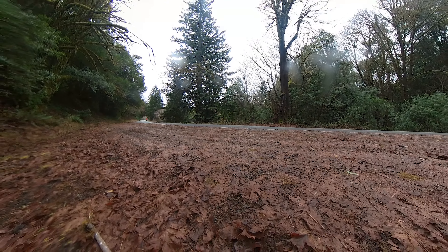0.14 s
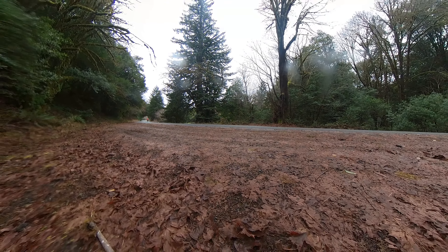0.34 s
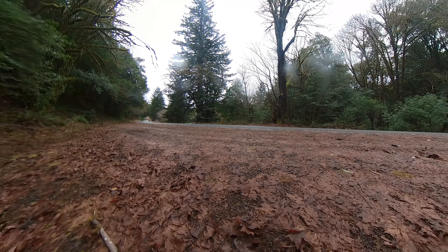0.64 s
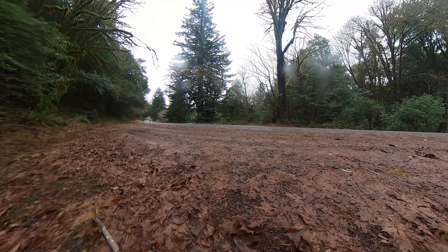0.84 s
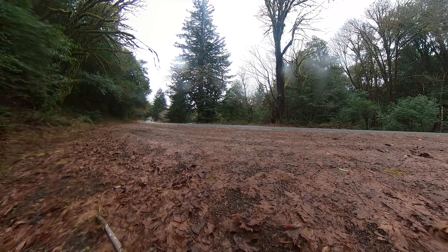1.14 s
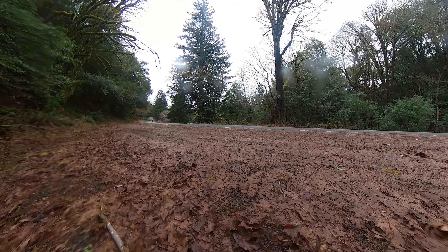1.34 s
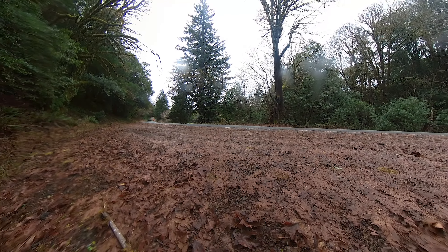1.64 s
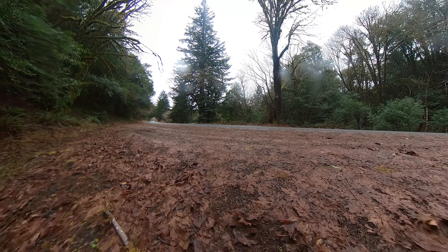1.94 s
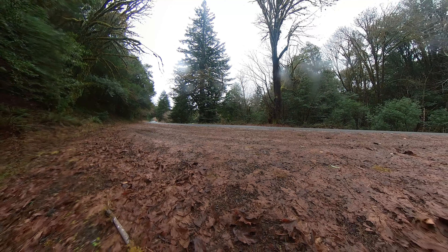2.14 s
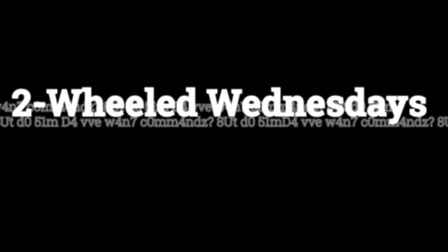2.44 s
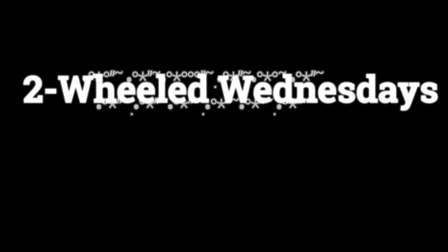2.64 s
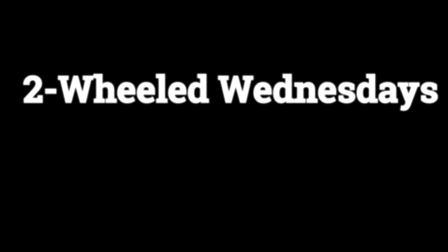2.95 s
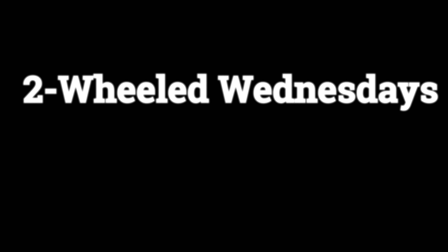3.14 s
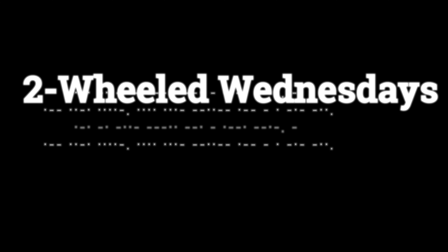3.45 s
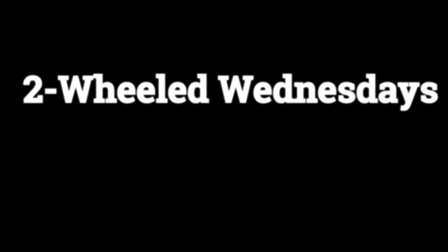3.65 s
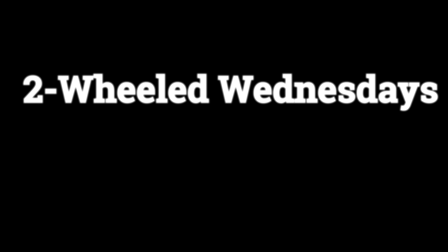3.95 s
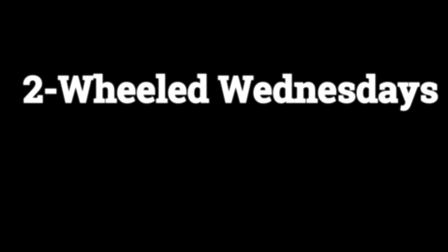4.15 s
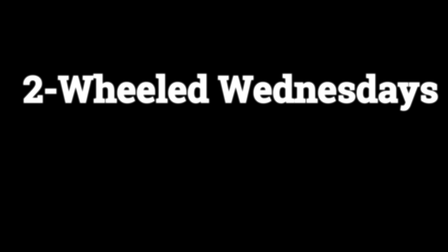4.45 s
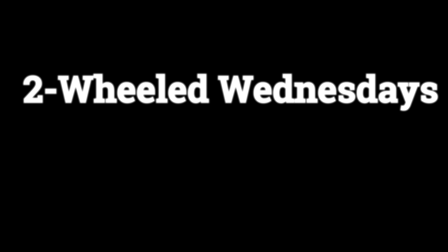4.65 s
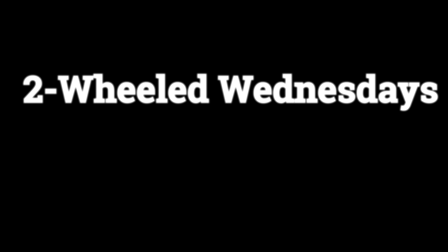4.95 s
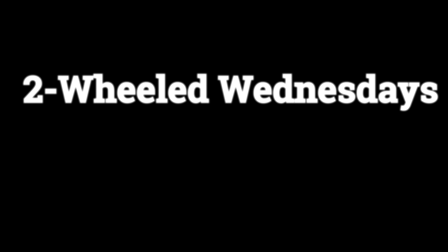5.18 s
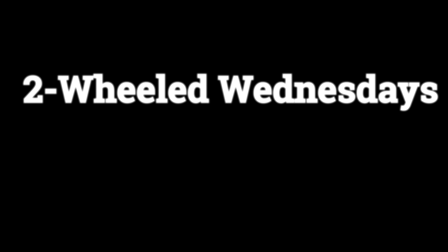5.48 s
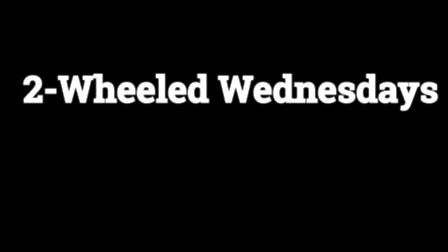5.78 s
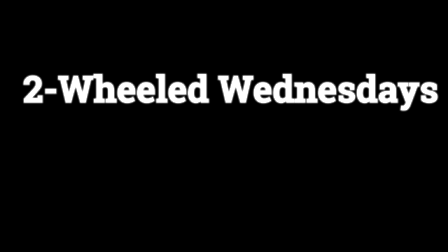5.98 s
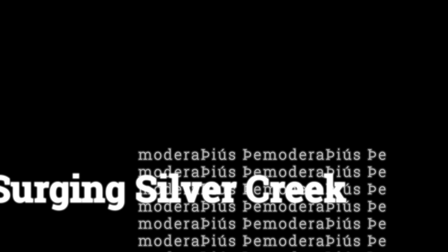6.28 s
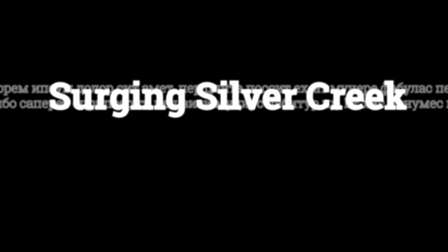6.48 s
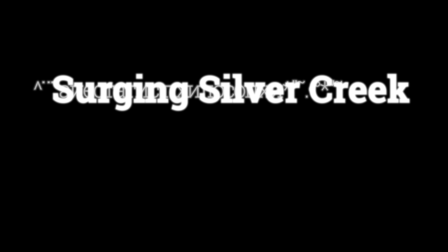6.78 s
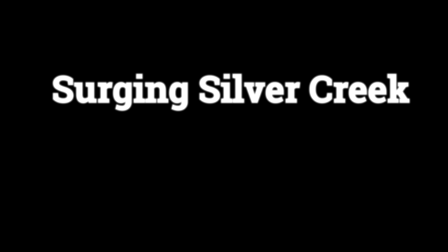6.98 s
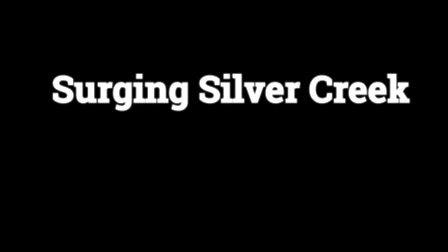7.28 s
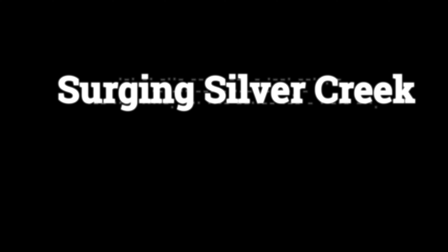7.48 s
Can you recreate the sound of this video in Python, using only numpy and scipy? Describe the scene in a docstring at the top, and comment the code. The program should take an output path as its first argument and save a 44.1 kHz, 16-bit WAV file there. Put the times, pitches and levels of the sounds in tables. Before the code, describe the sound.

A close mono microphone hears a bicycle hub ticking slowly over a faint low murmur. Ticking breaks into scattered slips with a burst of chain squeaks and tyre hum. Under pedalling, hard frame knocks and rattles cluster early, while thin high chirps, roller clicks and gritty sizzle grow denser. The chain then falls quiet and bright ticks run nearly thirty a second, spreading gradually until the cut, with brief dull reflections around them.

```python
"""A bicycle's rear wheel close to a microphone, over a deep murmur, tyre hum, rumble and the hiss of the spokes.
The freewheel first ticks slowly, a spray of impacts ringing the hub at each tooth; single teeth then slip.
The crank drives the chain: rollers click, links squeak and sizzle, knocks shake the frame, a spoke pings.
Teeth slip again as the crank lets go, then the wheel coasts with fast ticks, their gaps slowly growing.
A small hard space echoes freewheel, chain and frame throughout."""
import sys
import numpy as np
from scipy import signal
from scipy.fft import rfft, irfft, next_fast_len
from scipy.io import wavfile
from scipy.ndimage import uniform_filter1d

SR = 44100
rng = np.random.default_rng(int(sys.argv[2]) if len(sys.argv) > 2 else 0)


def master(y):
    """Save y as 16-bit WAV."""
    cut = np.clip(np.atleast_2d(y).T, -1, 1)
    pcm = np.round(cut * 32767)  # scale
    wavfile.write(sys.argv[1], SR, pcm.astype(np.int16))


N = 336042
BAND_TOP_HZ = .49 * SR  # just below Nyquist


def undb(db):
    """dB to gain."""
    return 10 ** (np.asarray(db) / 20)


def unit(x):
    """Scale to rms 1."""
    return x / np.sqrt(np.mean(x ** 2))


def peak_one(x):
    """Scale to peak 1."""
    return x / np.abs(x).max()


def band(x, lo_hz, hi_hz, order=2):
    """Butterworth band-pass."""
    return signal.sosfilt(signal.butter(order, [lo_hz, hi_hz], "band", fs=SR, output="sos"), x)


def noise_band(lo_hz, hi_hz):
    """Band-passed white noise."""
    return band(rng.standard_normal(N), lo_hz, hi_hz)


def coloured(spectrum):
    """Noise of rms 1, its spectrum drawn through (frequency [Hz], density [dB]) points."""
    hz, db = np.transpose(spectrum)
    size = next_fast_len(N)
    bins_hz = np.arange(1, size // 2 + 2) * SR / size
    gain = undb(np.interp(np.log(bins_hz), np.log(hz), db, left=-90, right=-90))
    return unit(irfft(rfft(rng.standard_normal(size)) * gain, size)[:N])


def envelope(points):
    """Levels in dB at every sample, straight lines between (time [s], level [dB]) points."""
    return np.interp(np.arange(N) / SR, *np.transpose(points))


def smooth_twice(x, size):
    """Two running means."""
    return uniform_filter1d(uniform_filter1d(x, size), size)


def walk(rate_hz):
    """Random levels held 1 / rate_hz seconds and slewed twice; spread near 1."""
    hold = int(SR / rate_hz)
    steps = np.repeat(rng.standard_normal(N // hold + 1), hold)
    return 1.9 * smooth_twice(steps, hold)[:N]


def add(track, s, sound, peak_db):
    """Lay a sound with the given peak into the track."""
    i = int(s * SR)
    track[i:i + len(sound)] += (undb(peak_db) * peak_one(sound))[:N - i]


def ring(modes, length_s, scatter_db, detune):
    """One blow on an object: each mode is four close decaying sines, mixed anew by every blow."""
    t = np.arange(int(length_s * SR))[:, None] / SR
    hz, db, t60_s = np.repeat(np.transpose(modes), 4, axis=1)
    level_chance, pitch_chance = rng.standard_normal((len(hz), 2)).T
    decay = np.exp(-np.log(1000) * t / t60_s)
    tones = np.sin(2 * np.pi * hz * (1 + detune * pitch_chance) * t)
    return (undb(db + scatter_db * level_chance) * decay * tones).sum(1)


def chatter(length_s, density, rise_s):
    """A spray of small impacts over a weaker scrape: swells in rise_s, decays by e each length_s."""
    t = np.arange(int(5 * length_s * SR) + 8) / SR
    hit_chance, height = rng.random((len(t), 2)).T
    hits = np.where(hit_chance < density, 1, .15) * (2 * height - 1)
    return hits * (1 - np.exp(-t / rise_s)) * np.exp(-t / length_s)


def squeak(hz, length_s, glide):
    """Stick-slip whistle of metal on metal: a short gliding tone, its level torn by the slipping."""
    t = np.linspace(0, 1, int(length_s * SR) + 12)  # fraction of the length
    pitch_hz = hz * (1 + glide * (t - .5))
    slips = unit(smooth_twice(rng.standard_normal(len(t)), 12))
    level = np.sin(np.pi * t ** .72) ** 2 * (1 + .8 * slips)
    return level * np.sin(2 * np.pi * np.cumsum(pitch_hz) / SR)


def murmur():
    """Deep murmur of the place: low noise swelling slowly from first to last."""
    return undb(np.linspace(-86.5, -76.5, N)) * unit(noise_band(35, 88))


def room(x):
    """Dense, slightly dull echoes of nearby hard surfaces: a decaying noise tail."""
    t60_s, wet_db, gap_s, damp_hz = .46, -12, .0011, 9000
    t = np.arange(int(.4 * SR)) / SR
    tail = rng.standard_normal(len(t)) * np.exp(-np.log(1000) * t / t60_s) * (t > gap_s)
    tail = band(tail, 74, damp_hz, order=1)
    return x + undb(wet_db) * signal.fftconvolve(x, tail / np.linalg.norm(tail))[:N]


# turning wheel, spectrum of the rumble: (frequency [Hz], density [dB])
RUMBLE_SPECTRUM = [(60, -40), (85, -37), (113, -0.5), (171, -5.5), (229, -3.5), (285, 0.5), (400, -0.5),
                   (520, -67)]
# rumble: (time [s], level [dB])
RUMBLE_LEVEL = [(0, -72), (2.0, -68), (2.78, -60), (2.9, -50.5), (3.6, -61.5), (5.0, -60.5), (5.3, -66),
                (7.62, -66)]


def wheel_rumble():
    """Low noise of the turning wheel, wavering slightly."""
    return undb(envelope(RUMBLE_LEVEL) + .7 * walk(11)) * coloured(RUMBLE_SPECTRUM)


# spokes in air, spectrum of the hiss: (frequency [Hz], density [dB])
HISS_SPECTRUM = [(350, -23), (620, -2), (800, -2), (1090, -2.5), (2700, -1.5), (3950, -10.5), (5210, -10.5),
                 (6490, -14.5), (9500, 0.5), (12400, -72)]
# hiss: (time [s], level [dB])
HISS_LEVEL = [(0, -60.5), (1.56, -65.5), (1.6, -55.5), (1.8, -60), (2.5, -52.5), (5.0, -50), (5.15, -58.5),
              (5.3, -54), (7.62, -56)]


def spoke_hiss():
    """Spokes hiss through the air: wavering coloured noise."""
    return undb(envelope(HISS_LEVEL) + 1.5 * walk(40)) * coloured(HISS_SPECTRUM)


# air ring in the tyre, then the broad roar above it: (centre [Hz], width [Hz])
TYRE_BANDS = [(474, 40), (530, 110)]
# tyre hum: (time [s], level [dB])
HUM_LEVEL = [(0, -71.5), (1.55, -80), (1.6, -51), (1.78, -55), (1.95, -58.5), (2.2, -51.5), (3.4, -53.5),
             (4.8, -56.5), (5.03, -56.5), (5.11, -77), (5.22, -52), (6.0, -53.5), (6.4, -57.5),
             (7.62, -55.5)]
# roar above the hum: (time [s], level [dB])
ROAR_LEVEL = [(0, -72), (1.55, -72.5), (2.3, -57.5), (5.0, -58.5), (5.12, -63), (5.35, -50), (6.4, -55),
              (7.62, -59)]


def tyre():
    """The tyre's air ring hums and roars: two noise bands, each wavering on its own."""
    out = np.zeros(N)
    for (hz, width_hz), level in zip(TYRE_BANDS, (HUM_LEVEL, ROAR_LEVEL)):
        noise = unit(noise_band(hz - width_hz / 2, hz + width_hz / 2))
        out += undb(envelope(level) + 2.76 * walk(14)) * noise
    return out


# blows on the frame: (time [s], thud peak [dB], rattle peak [dB], contact [ms],
# rattle decay time [s], rattle centre [Hz])
FRAME_KNOCKS = [(1.041, -50, -44, 0.9, 0.016, 1000), (2.246, -29.5, -28, 0.25, 0.027, 1240),
                (2.531, -20, -19, 0.17, 0.0094, 1520), (2.576, -32, -33, 0.23, 0.0089, 1570),
                (2.814, -17, -28, 0.65, 0.046, 1270), (2.849, -24.5, -30, 2.1, 0.019, 2300),
                (2.946, -32.5, -39.5, 2.56, 0.043, 1460), (3.156, -32, -42, 2.8, 0.015, 1520),
                (4.138, -29, -25, 0.32, 0.029, 1220)]
# frame modes: (frequency [Hz], level [dB], t60 [s])
FRAME_MODES = [(166.3, -7, 0.42), (240, -11.5, 0.21), (358, 11, 0.048), (427, 6.5, 0.081),
               (481, 6.5, 0.065), (538, 5.5, 0.059), (750, -1, 0.091), (1037, -3, 0.18), (1410, 0.5, 0.05),
               (1800, 6, 0.051)]


def frame_knocks():
    """Knocks shake the frame, longer contact giving a duller thud, with loose parts rattling."""
    out = np.zeros(N)
    for s, thud_db, rattle_db, contact_ms, rattle_s, rattle_hz in FRAME_KNOCKS:
        blows = chatter(rattle_s, density=.025, rise_s=.0029)
        push = np.hanning(int(contact_ms * SR / 1000) + 3)
        body = ring(FRAME_MODES, .25, scatter_db=2, detune=.03)
        thud = signal.fftconvolve(np.convolve(blows, push), body)
        # a brief tap is too light to move the deep modes
        low_hz = 62 + 70 / (contact_ms + .028)
        add(out, s, band(thud, low_hz, 4200, order=3), thud_db)
        rattle = chatter(rattle_s, density=.05, rise_s=.0011)
        add(out, s, band(rattle, rattle_hz / 1.98, rattle_hz * 1.6), rattle_db)
        bright_rattle = chatter(rattle_s, density=.091, rise_s=.009)
        add(out, s, band(bright_rattle, 1400, 10300), rattle_db - .5)
    return out


# pings of a spoke: (time [s], peak [dB])
SPOKE_PINGS = [(3.347, -28)]
# spoke modes: (frequency [Hz], level [dB], t60 [s])
SPOKE_MODES = [(3060, 0, .12)]


def spoke_pings():
    """A spoke slips over its neighbour with a squeak, then rings."""
    out = np.zeros(N)
    for s, db in SPOKE_PINGS:
        tap = chatter(.0056, density=.12, rise_s=.002)
        spoke = ring(SPOKE_MODES, .2, scatter_db=2, detune=.03)
        add(out, s, signal.fftconvolve(tap, spoke), db)
        add(out, s - .008, squeak(3590, .0153, -.28), db - 3)
    return out


# sprocket modes, for roller clicks and sizzle: (frequency [Hz], level [dB], t60 [s])
SPROCKET_MODES = [(6320, -10.5, 0.02), (6624, -3, 0.019), (7670, -14, 0.012), (12730, -10, 0.006)]
# links grinding, heard through the frame: (frequency [Hz], density [dB])
GRIND_SPECTRUM = [(600, -23), (800, -5.5), (1030, -3.5), (1300, -26), (3400, -2), (4600, -6), (5600, -10)]
# gain on the whole sizzle mix: (time [s], level [dB])
SIZZLE_LEVEL = [(0, -50.5), (1.4, -59.5), (1.58, -41.5), (1.8, -52), (2.8, -46), (3.3, -39), (3.8, -39.5),
                (5.02, -35), (5.15, -54), (5.3, -49.5), (7.62, -48)]


def chain_sizzle():
    """A host of tiny squeaks, scraping, grinding and slack links tapping the sprocket at random."""
    grains = np.zeros(N)
    for when, pitch, size, length, bend in rng.random((1500, 5)):
        tiny = squeak(8500 + 7600 * pitch ** .38, .0019 + .028 * length, .16 * (bend - .5))
        add(grains, when * (N - 9) / SR, tiny, -3.5 * np.log(size + .03))
    scrape = undb(3.7 * walk(60)) * noise_band(4700, BAND_TOP_HZ)
    # strong wavering tears the grind into crackles
    grind = undb(np.minimum(7 * walk(300), 12)) * coloured(GRIND_SPECTRUM)
    slack = np.zeros(N)
    # six spots on the sprocket, each with its own ring; 45 taps a second on average, mostly faint
    for tap_chance, strength in rng.random((6, 2, N)):
        taps = (tap_chance < 45 / SR) * undb(28 * strength)
        blows = chatter(.0034, density=.45, rise_s=.0005)
        spot = np.convolve(blows, ring(SPROCKET_MODES, .024, scatter_db=-9.5, detune=.045))
        slack += signal.fftconvolve(taps, spot)[:N]
    slack = band(slack, 2800, BAND_TOP_HZ)
    mix = .71 * unit(grains) + .13 * unit(scrape) + .15 * unit(grind) + .38 * unit(slack)
    return undb(envelope(SIZZLE_LEVEL)) * mix


# dry links squeaking: (time [s], peak [dB], pitch [Hz])
LINK_SQUEAKS = [(1.603, -21, 9200), (1.63, -29, 9800), (1.653, -25.5, 10500), (1.9, -24.5, 11500),
                (1.997, -37, 4770), (2.189, -21, 14600), (2.314, -25, 12130), (2.518, -18.5, 12340),
                (2.748, -14.5, 13500), (2.865, -15, 15000), (3.0207, -23, 12650), (3.1513, -18.5, 13300),
                (3.175, -20, 13300), (3.661, -16, 15100), (3.691, -11.5, 13200), (4.123, -19, 15200),
                (4.133, -12, 13650), (4.315, -18, 13000), (4.412, -30.5, 3470), (4.4134, -22, 13900),
                (4.517, -34, 2800), (4.7, -25, 9000), (4.526, -17.5, 14700), (4.571, -17, 14600),
                (4.717, -18, 13300), (4.815, -15.5, 14200), (4.8344, -9, 15400), (4.8988, -21, 15200),
                (4.954, -12.5, 15000), (5.013, -16, 14300)]


def link_squeaks():
    """Dry links squeak, each gliding up or down at random."""
    out = np.zeros(N)
    for s, db, hz in LINK_SQUEAKS:
        add(out, s - .002, squeak(hz, .013, .12 * rng.standard_normal()), db)
    return out


# rollers seating on the sprocket: (time [s], peak [dB])
ROLLER_CLICKS = [(2.212, -30), (2.2532, -30), (2.4842, -36), (2.53, -29), (2.77, -27), (2.8823, -28),
                 (2.9302, -27.5), (2.9575, -26), (3.004, -29), (3.0404, -35), (3.057, -22.5), (3.0884, -28),
                 (3.114, -22), (3.133, -22), (3.1717, -24.5), (3.271, -32), (3.3173, -29), (3.3544, -24.5),
                 (3.4667, -31), (3.501, -19.5), (3.5736, -31), (3.6357, -29.5), (3.781, -25), (3.863, -27),
                 (3.899, -30), (3.9953, -29), (4.0821, -27), (4.116, -24), (4.136, -22), (4.1812, -25),
                 (4.2124, -28), (4.2793, -24), (4.314, -28), (4.343, -24), (4.376, -27), (4.4064, -21.5),
                 (4.4387, -25), (4.527, -23.5), (4.555, -37), (4.561, -25), (4.5815, -24), (4.6253, -27),
                 (4.6616, -33), (4.73, -24), (4.825, -29), (4.8837, -25), (4.909, -24), (4.958, -27),
                 (4.9997, -23), (5.0262, -24), (5.0587, -27.5), (5.0932, -29.5)]


def roller_clicks():
    """Rollers strike the sprocket, which rings briefly."""
    out = np.zeros(N)
    for s, db in ROLLER_CLICKS:
        blows = chatter(.0021, density=.34, rise_s=.0011)
        sprocket = ring(SPROCKET_MODES, .016, scatter_db=.5, detune=.013)
        add(out, s, band(signal.fftconvolve(blows, sprocket), 2800, BAND_TOP_HZ), db)
    return out


# hub and rim modes, damped by grease: (frequency [Hz], level [dB])
HUB_MODES = [(1440, -14), (2040, -17), (2300, -2), (2720, 8.5), (3500, -0.5), (4690, -5.5), (6430, 21),
             (7460, 20), (8700, 16.5), (10300, 19), (12300, 17.5), (13700, 13.5), (14450, 23), (15650, 22)]
# coasting, one tick a tooth: (first tick [s], teeth, starting gap [ms], half the gap's growth per tooth [ms])
COAST_RUNS = [(.02737, 22, 60.554, .16672), (5.3905, 63, 33.282, .03926)]
# nominal tick peak of each coast: (level [dB])
COAST_LEVELS = [-18, -18.5]
# single teeth slipping as the crank catches the wheel or lets go: (time [s], nominal peak [dB])
TOOTH_SLIPS = [(1.444, -16.5), (1.558, -20), (1.7674, -18), (1.8628, -15), (2.013, -15.5), (5.173, -20.5),
               (5.218, -19.5), (5.26, -20), (5.2952, -19), (5.3285, -20.5), (5.36, -19)]


def freewheel():
    """Two pawls land a few ms apart: a wide grainy crack, a brief ring of the hub and a loose rattle."""
    ticks = list(TOOTH_SLIPS)
    for (first_s, teeth, gap_ms, growth_ms), db in zip(COAST_RUNS, COAST_LEVELS):
        ticks += [(first_s + (gap_ms * k + growth_ms * k * k) / 1000, db) for k in range(teeth)]
    # t60: a base time plus 42 cycles
    modes = [(hz, db, .005 + 42 / hz) for hz, db in HUB_MODES]
    out = np.zeros(N)
    for (s, db), (lag, second, size) in zip(ticks, rng.random((len(ticks), 3))):
        blows = chatter(.0046, density=.22, rise_s=.0005)
        late = int((.001 + .004 * lag) * SR) + 1
        second_pawl = chatter(.0046, density=.2, rise_s=.0006)
        blows[late:] += .7 * second * second_pawl[:len(blows) - late]
        hub = peak_one(signal.fftconvolve(blows, ring(modes, .035, scatter_db=4.5, detune=.022)))
        bare_crack = band(peak_one(blows), 5500, 20000)
        hub[:len(blows)] += undb(-4) * bare_crack
        add(out, s + .0002, band(hub, 1950, BAND_TOP_HZ), db + 2.5 * (size - .5))
        rattle = chatter(.014, density=.035, rise_s=.011)
        add(out, s, band(rattle, 1370, 9000), db - 21)
    return out


def scene():
    """Mono: the struck and rubbing parts excite the room; wheel noise and murmur stay dry."""
    background = murmur() + wheel_rumble() + spoke_hiss() + tyre()
    frame = frame_knocks() + spoke_pings()
    chain = chain_sizzle() + link_squeaks() + roller_clicks()
    return (background + room(frame + chain + freewheel()))[None]


def record(dry):
    """The microphone drops the deep bass; the treble falls away in a step, then a steep cut."""
    thin = signal.sosfilt(signal.butter(2, 70, "high", fs=SR, output="sos"), dry)
    step = signal.sosfilt(signal.ellip(6, .3, 26, 15900, fs=SR, output="sos"), thin)
    return signal.sosfilt(signal.ellip(10, .2, 80, 17146, fs=SR, output="sos"), step)


dry = scene()
out = record(dry)
master(out)
```